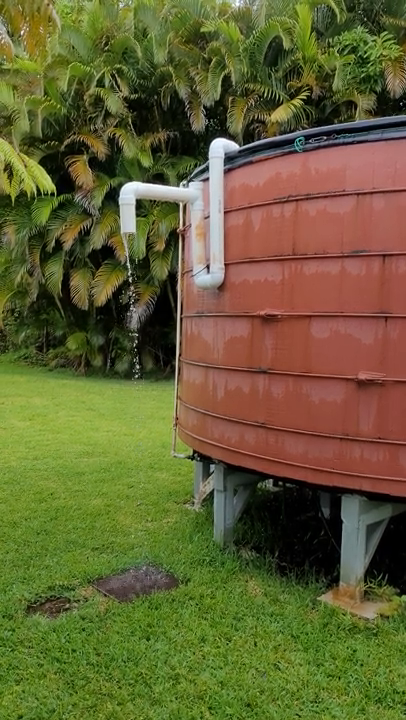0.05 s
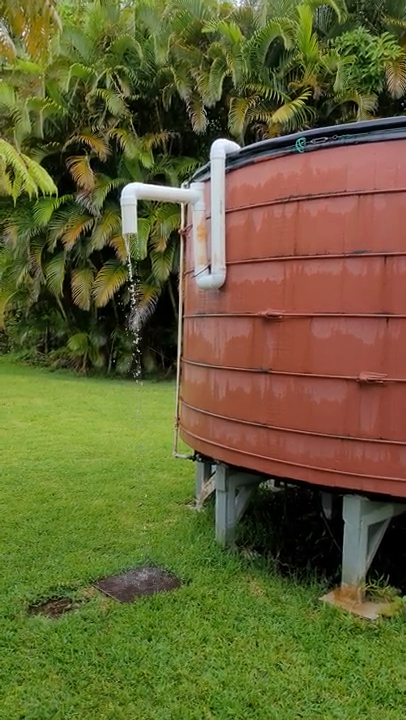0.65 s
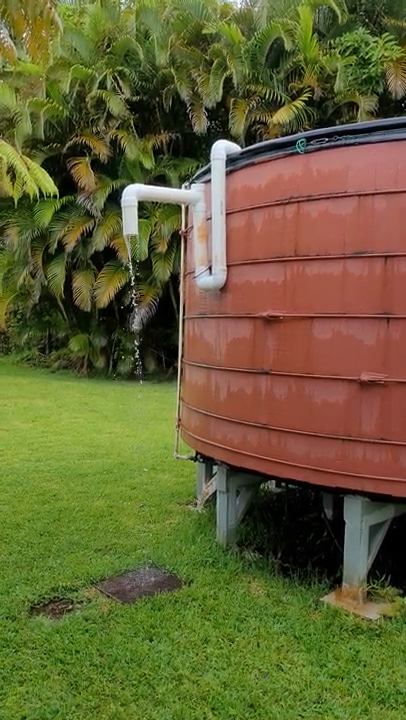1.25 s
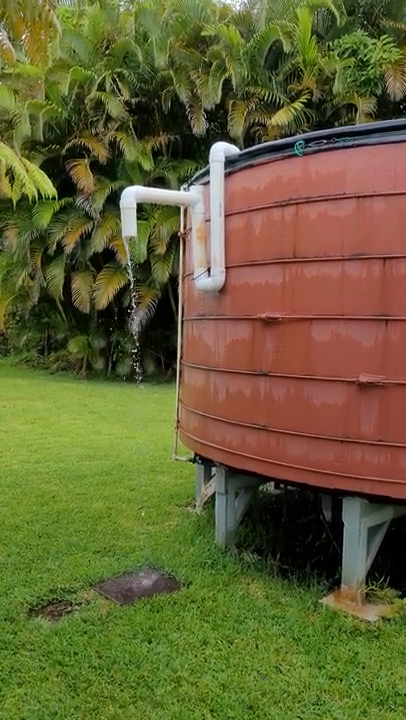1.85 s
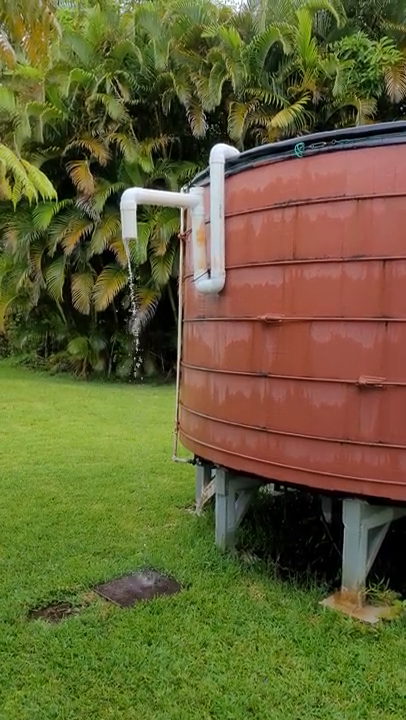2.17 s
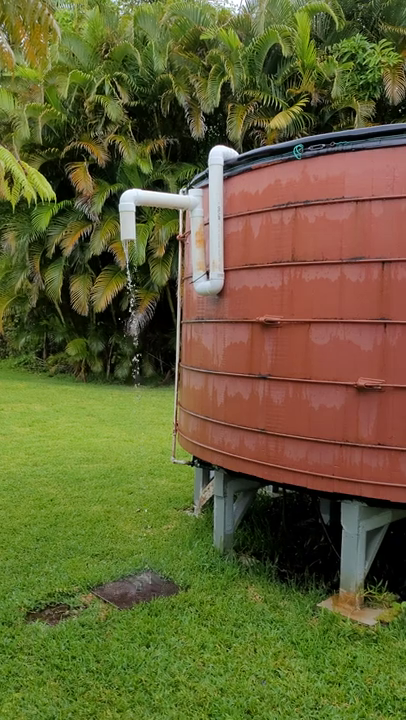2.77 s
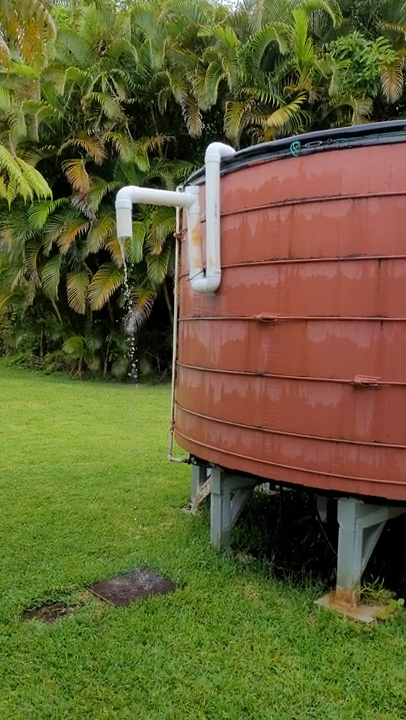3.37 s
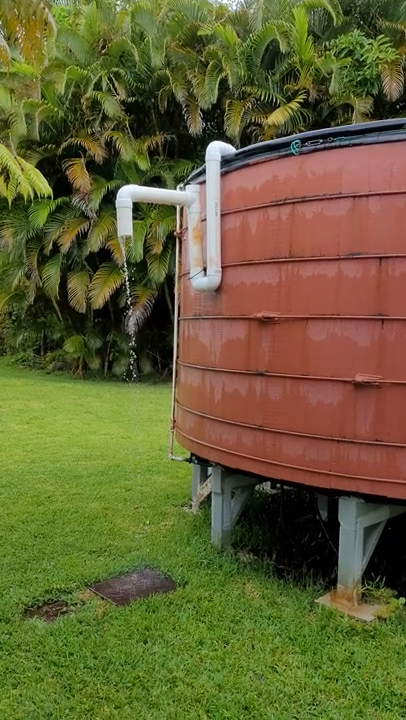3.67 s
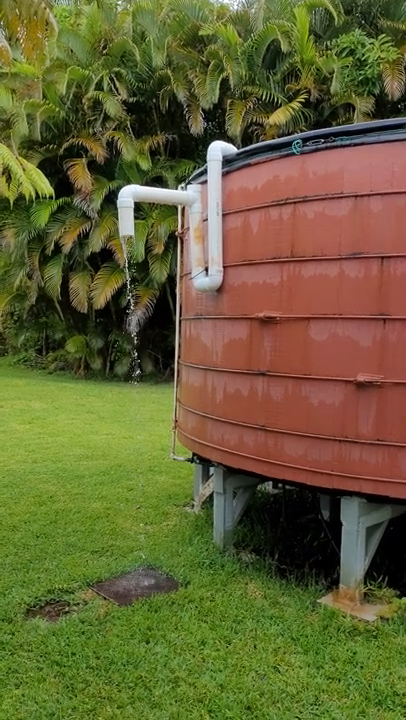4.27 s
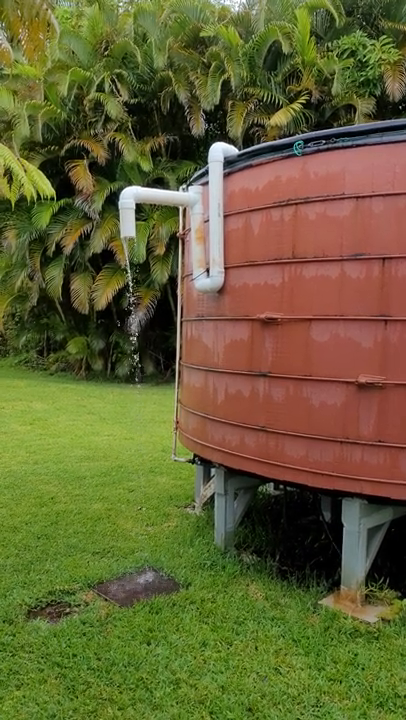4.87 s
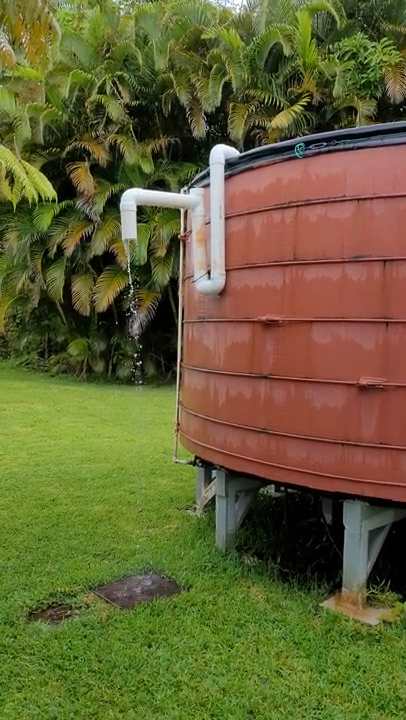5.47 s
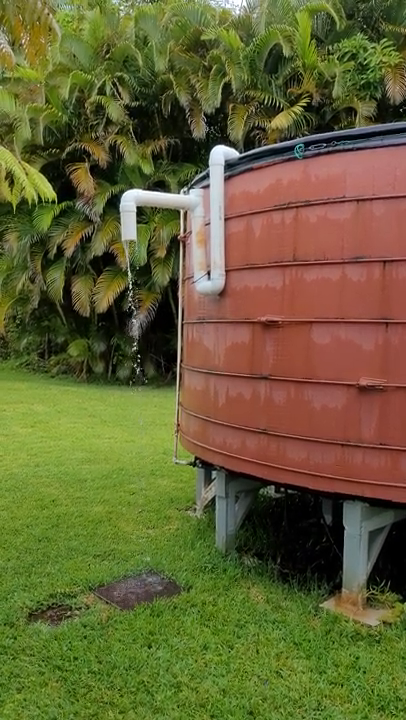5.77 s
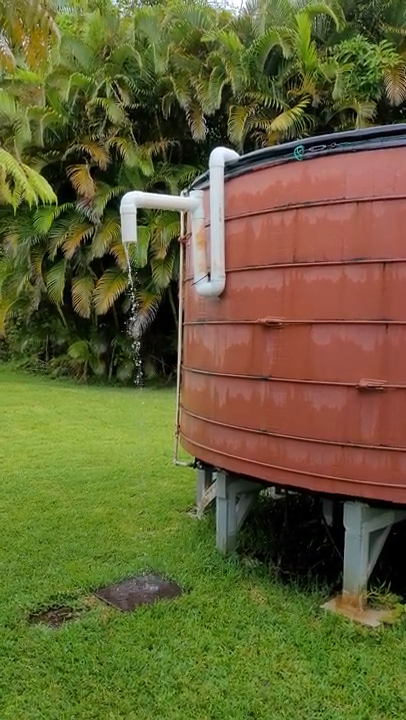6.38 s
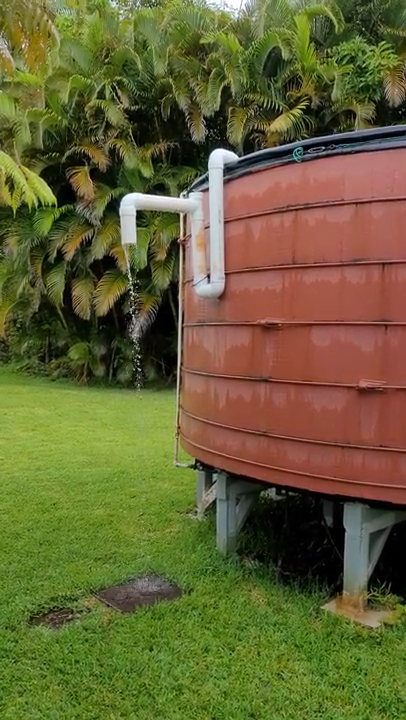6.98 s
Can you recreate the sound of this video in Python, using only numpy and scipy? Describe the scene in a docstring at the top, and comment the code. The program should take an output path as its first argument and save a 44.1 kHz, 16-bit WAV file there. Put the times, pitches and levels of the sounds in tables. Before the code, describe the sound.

From the start, a thin stream of water from a tank's overflow pipe splatters onto a wet slab, close and crisp, and continues for about seven seconds. Drops land quickly and unevenly, each a sharp, bright slap with a short splash, while fine spray patters and fizzes around them. Stronger slaps stand out near 1.3, 1.6, 2.0, 2.8, 4.9 and 5.9 seconds. Small bubbly plops are scattered through, clearest around 3.4 and 5.2 seconds. The heaviest drops add short dull thuds near 1.3, 4.6, 4.9 and 5.9 seconds. The splatter thins briefly around 5.6 seconds. The space is outdoors, with only a very short tail on the splashes. Far beneath the water lie a soft, steady hush of leaves and the faint low drone of a distant engine. At about 3.5 seconds a far bird gives one very faint, short rising whistle.

```python
"""A thin stream from a water tank's overflow pipe breaks into drops that splatter on a wet slab in a lawn.
Each drop slaps the water film and throws a short splash while fine spray patters around it. Some drops
trap bubbles and plop; the heaviest thud. A quick echo comes off a nearby hard surface, the ground or tank;
tank, legs and hedge add a short tail. Behind it: a soft hush of leaves, a distant engine, one faint bird."""
import sys
import numpy as np
from scipy import signal
from scipy.fft import rfft, irfft, next_fast_len
from scipy.io import wavfile
from scipy.ndimage import map_coordinates

SR = 44100
rng = np.random.default_rng(int(sys.argv[2]) if len(sys.argv) > 2 else 0)


def transcribe(signal):
    """Save signal, clipped to [-1, 1], as a 16-bit WAV file at the path in sys.argv[1]."""
    frames = np.atleast_2d(signal).T
    limited = np.clip(frames, -1, 1)
    pcm = np.round(limited * 32767).astype(np.int16)
    wavfile.write(sys.argv[1], SR, pcm)


N = 318843
TIME = np.arange(N) / SR
TOP_HZ = 16000

# The spray's swells and dips. Each row: time in seconds, relative level in dB.
SPRAY_LEVEL = [(0.0, -42), (2.86, -42), (3.34, -44), (3.89, -41.5), (4.15, -43.5), (5.05, -41.5),
               (5.34, -41.5), (6.12, -41.5), (6.3, -42.5), (6.42, -48.5), (6.67, -40.5), (6.97, -42.5),
               (7.09, -44), (7.23, -40)]
# The engine's drone. Each row: pitch of a partial in Hz, relative level in dB.
ENGINE_PARTIALS = [(42, -64), (63.5, -66.5), (78, -66.5), (102, -73.5)]
# Large drops on the slab. Each row: start in seconds, relative slap and splash levels in dB,
# nominal pitch in Hz.
LARGE_DROPS = [(0.0192, -31.5, -29.5, 6700), (0.0577, -31.5, -51, 6850), (0.1208, -29, -47, 7200),
               (0.2025, -28.5, -39, 4760), (0.3035, -29, -38, 7300), (0.3514, -28, -44, 7800),
               (0.4134, -22, -32, 7740), (0.4502, -24, -38, 7200), (0.4688, -26.5, -35.5, 5100),
               (0.5701, -32.5, -46, 4000), (0.6007, -31, -56, 8400), (0.6474, -33.5, -44, 7440),
               (0.6899, -27.5, -31, 7400), (0.745, -30, -40, 6300), (0.7635, -26, -30.5, 5000),
               (0.7891, -30.5, -35.5, 4700), (0.893, -30.5, -44, 6600), (0.9917, -34, -44, 4400),
               (1.0832, -30.5, -43, 6600), (1.1392, -29.0, -50, 6300), (1.1772, -27, -42, 6300),
               (1.2718, -28, -53, 9100), (1.3115, -19, -32.5, 4800), (1.4338, -21, -31, 6950),
               (1.5105, -29.0, -43, 5000), (1.5711, -25, -31, 6750), (1.645, -16.5, -29, 5000),
               (1.6984, -33, -34, 4000), (1.7196, -28.5, -41, 4570), (1.7921, -23, -35, 6750),
               (1.8062, -26, -33, 5300), (1.8463, -26, -40, 5800), (1.9849, -27, -37, 3800),
               (2.0149, -19.5, -33, 3800), (2.1694, -29.5, -42.0, 8640), (2.2033, -36, -35, 4900),
               (2.2219, -33.5, -45, 6100), (2.2629, -27.5, -35.5, 4200), (2.3457, -28, -35.5, 6600),
               (2.42, -28.5, -35, 4900), (2.4359, -24, -41, 7760), (2.5638, -30, -32.0, 5000),
               (2.5882, -23, -40, 6200), (2.6665, -32.5, -40, 5600), (2.8024, -17, -30.5, 4700),
               (2.8363, -27.5, -39, 6500), (2.8649, -29, -38, 7200), (2.9037, -25.5, -46.0, 7200),
               (2.9598, -29.5, -34.5, 7700), (2.9941, -32, -52, 7100), (3.0879, -32, -38.0, 5800),
               (3.1298, -29.5, -42.5, 5300), (3.2384, -23.5, -35.5, 6600), (3.3768, -25.5, -37, 5400),
               (3.4137, -29.0, -40, 4400), (3.43, -26.5, -45, 3080), (3.5422, -28.5, -39, 4770),
               (3.6888, -25, -33.5, 6600), (3.8266, -27, -41, 5500), (3.8442, -29.5, -40, 6230),
               (3.9166, -32, -51, 4200), (3.9348, -22.5, -36, 6500), (3.9558, -25.5, -36.5, 5300),
               (3.999, -26.5, -35, 6600), (4.0207, -27, -35, 5000), (4.0675, -22.0, -40.5, 4300),
               (4.12, -28.0, -45, 4360), (4.1638, -31.5, -50, 6000), (4.3034, -29.5, -34.5, 5170),
               (4.3492, -32, -49, 5400), (4.4072, -26.5, -32, 4400), (4.4236, -31, -40, 4700),
               (4.4424, -28.5, -49, 5630), (4.4653, -29, -30, 6330), (4.4936, -24.5, -39, 5060),
               (4.6093, -29.5, -41.5, 5360), (4.6908, -28, -58, 8600), (4.7415, -32.0, -34.5, 7600),
               (4.8601, -17, -29, 4960), (4.898, -27.5, -36, 5470), (4.922, -31, -53, 6040),
               (4.9729, -28.5, -52, 5300), (5.0244, -24.5, -35, 6700), (5.1628, -28.5, -36, 3680),
               (5.1753, -27, -45, 3640), (5.1978, -25.5, -51, 6000), (5.2538, -29.5, -45, 7240),
               (5.3118, -27, -43.5, 3960), (5.4333, -29.5, -42, 6300), (5.7943, -30, -52, 7500),
               (5.8132, -29, -44, 4160), (5.8455, -23.5, -35, 7800), (5.8544, -16.5, -32.5, 5660),
               (5.9065, -26.5, -39.0, 4900), (5.9249, -29, -46, 6160), (5.9867, -21.5, -31.5, 4630),
               (6.0494, -25.5, -32, 5600), (6.0936, -29.0, -40, 5900), (6.1159, -28, -30.5, 4350),
               (6.1317, -22.5, -35.0, 4400), (6.1645, -26.5, -34, 5470), (6.2073, -28, -32, 5760),
               (6.284, -28.5, -38, 4250), (6.3124, -29, -40, 4460), (6.4446, -20.5, -29.5, 4900),
               (6.468, -24, -41, 4350), (6.4929, -26.5, -36, 6840), (6.5348, -32, -35, 5100),
               (6.5722, -30, -37, 6800), (6.6373, -27.5, -43, 6160), (6.6816, -24, -34.5, 3580),
               (6.7074, -26.5, -41, 4080), (6.9242, -26.5, -40, 4830), (6.9846, -31, -38.5, 5170),
               (7.0299, -27, -53, 5270), (7.0807, -29, -38, 8200), (7.1243, -28, -35, 6600),
               (7.1897, -28.5, -39, 6270), (7.2135, -27, -48, 5200)]
# Drops plunging into standing water. Each row: start in seconds, relative level in dB, bubble pitch in Hz.
BUBBLE_PLOPS = [(0.7896, -24.5, 3330), (1.3109, -30, 2960), (1.6467, -25, 2700), (1.846, -25.5, 2130),
                (2.0147, -32, 2450), (2.2638, -33, 2600), (2.801, -27, 3260), (3.3767, -22.5, 2630),
                (3.4291, -25, 2160), (4.066, -23, 3000), (4.1195, -27, 1900), (4.8594, -23, 1670),
                (5.1749, -19, 2980), (5.3127, -36, 2860), (6.131, -27, 2970), (6.2867, -26, 2700),
                (6.68, -26, 1890), (6.7067, -24, 2960)]
# The heaviest drops. Each row: start in seconds, relative peak level in dB.
HEAVY_DROPS = [(1.2712, -42), (4.608, -44), (4.859, -36), (5.8535, -38)]
# The bird's glide. Each row: time in seconds, pitch in Hz, level in dB.
BIRD_GLIDE = [(3.48, 1620, -75), (3.51, 1680, -53), (3.55, 1810, -55), (3.59, 1870, -59), (3.64, 1850, -74)]
# The tone colour of each layer. Each row: frequency in Hz, relative gain in dB.
PATTER_EQ = [(300, -22), (1200, 5.5), (2200, -5.5), (3200, 3.5), (4700, -2.5), (6200, -0.5), (7500, 2),
             (9000, -3), (11500, -16), (15000, -2)]
MIST_EQ = [(2000, -28), (6000, 1), (8800, -3.5), (11500, 2), (14000, 4), (16000, -4)]
LEAVES_EQ = [(20, -10), (150, -10), (220, -2), (400, 1.5), (700, 5), (1100, 4), (1600, 1.5), (2500, -2),
             (6000, -11.5), (16000, -38)]
RUMBLE_EQ = [(15, -32), (30, -11), (50, -1.5), (66, -1), (85, -2.5), (120, -10), (160, -17), (400, -59)]
SPLAT_EQ = [(150, -22), (600, -0.5), (1500, 3.5), (3000, 5.5), (4700, -2.5), (6300, 3.5), (7500, 0.5),
            (8800, -6.5), (11500, 3.5), (15500, 3.5)]
# The colour of the phone's two microphone ports. Each row: frequency in Hz, left over right in dB.
PORT_BALANCE = [(300, 1.5), (1200, -2.5), (2000, 1), (3200, -1), (5000, 2), (6500, 3), (8200, -7),
                (9800, 3.5), (11200, -3.5), (14000, 2)]


def amp(db):
    return 10 ** (np.asarray(db) / 20)


def unit_rms(x):
    return x / np.sqrt(np.mean(x ** 2) + 1e-20)


def eq_db(points, hz):
    """An EQ curve read on a log frequency axis."""
    knots_hz, db = np.transpose(points)
    return np.interp(np.log(hz + 1), np.log(knots_hz + 1), db)


def curves(rows):
    """One value per sample for each column after the time."""
    times, *columns = np.transpose(rows)
    return [np.interp(TIME, times, column) for column in columns]


def wobble(rate):
    """A smooth random curve, rate knots a second."""
    return map_coordinates(rng.standard_normal(int(N * rate / SR) + 4), [TIME * rate])


def filtered(x, response):
    """x through a frequency response."""
    size = next_fast_len(N + SR // 2)
    return irfft(rfft(x, size) * response(np.fft.rfftfreq(size, 1 / SR)), size)[..., :N]


def coloured(x, eq):
    """x through an EQ curve, at rms 1."""
    return unit_rms(filtered(x, lambda hz: amp(eq_db(eq, hz))))


def delayed(x, seconds):
    return map_coordinates(x, [np.arange(N) - seconds * SR])


def placed(times, sounds):
    """Each row of sounds mixed in at its start time."""
    index = np.maximum(np.round(times * SR).astype(int), 0)[:, None] + np.arange(sounds.shape[1])
    return np.bincount(index.ravel(), sounds.ravel(), N)[:N]


def bell(hz, centre_hz, octaves):
    return np.exp(-.5 * (np.log2((hz + 1) / centre_hz) / octaves) ** 2)


def tight_pulses(spectra):
    """The snappiest (minimum-phase) pulse for each row of gains."""
    cepstrum = irfft(np.log(spectra + 1e-6))
    half = cepstrum.shape[-1] // 2
    cepstrum[:, 1:half] *= 2
    cepstrum[:, half + 1:] = 0
    return irfft(np.exp(rfft(cepstrum)))


def grains(times, hz, strength, cycles, glide, samples):
    """Tiny bubbles and droplet impacts: each swells, rings for a few cycles and rises in pitch."""
    turns = hz.reshape(-1, 1) * np.arange(samples) / SR
    age = turns / cycles
    phase = turns * (1 + glide * np.minimum(age, 10)) + rng.random((hz.size, 1))
    ring = age * np.exp(-age) * np.sin(2 * np.pi * phase)
    ring /= np.linalg.norm(ring, axis=1, keepdims=True) + 1e-12
    return placed(times.ravel(), ring * strength.reshape(-1, 1))


def bursts(starts, db, hz, life_s, octaves, cycles, spread_db, count, samples):
    """A cluster of grains after each start, thinning out and scattered in pitch around hz."""
    shape = (len(starts), count)
    wait = -life_s * np.log(1 - (np.arange(count) + rng.random(shape)) / count)
    pitch = np.minimum(hz[:, None] * 2 ** (octaves * rng.standard_normal(shape)), TOP_HZ)
    strength = amp(spread_db * rng.standard_normal(shape)) * np.exp(-.5 * wait / life_s)
    strength *= (amp(db) * np.sqrt(life_s * SR / 2) / np.linalg.norm(strength, axis=1))[:, None]
    return grains(starts[:, None] + wait, pitch, strength, cycles, glide=0.0057, samples=samples)


def patter(centre_hz, octaves, spread_db, count):
    """Thrown droplets land again at random, each with its own pitch."""
    pitch = np.minimum(centre_hz * 2 ** (octaves * rng.standard_normal(count)), TOP_HZ)
    strength = amp(spread_db * np.clip(rng.standard_normal(count), -2, 1.7))
    starts = rng.random(count) * N / SR
    return coloured(grains(starts, pitch, strength, cycles=0.77, glide=0.0058, samples=128), PATTER_EQ)


def mist(per_second, spread_db):
    """The finest droplets land as a bright fizz of uneven ticks."""
    hit = rng.random(N) < per_second / SR
    strength = amp(spread_db * np.clip(rng.standard_normal(N), -2, 2))
    return coloured(hit * strength * rng.choice([-1, 1], N), MIST_EQ)


def spray(patter_db, mist_db, clump_db):
    """The spray comes in clumps: its larger droplets patter, the finest fizz."""
    level = curves(SPRAY_LEVEL)[0] + clump_db * wobble(70)
    coarse = patter(centre_hz=5570, octaves=0.47, spread_db=9.0, count=4500) * amp(level + patter_db)
    fine = mist(per_second=1800, spread_db=9.0) * amp(level + mist_db + 2.65 * wobble(110))
    return coarse + fine


def leaves(level_db):
    """Leaves hush all around: a wide, gently wavering bed."""
    noise = rng.standard_normal((2, N)) + 0.48 * rng.standard_normal(N)
    return coloured(noise, LEAVES_EQ) * amp(level_db + 0.74 * wobble(2.94))


def distant_engine(rumble_db, drone_gain_db):
    """Far away an engine drones unsteadily over a low, nearly mono rumble."""
    noise = rng.standard_normal(N) + 0.18 * rng.standard_normal((2, N))
    sound = coloured(noise, RUMBLE_EQ) * amp(rumble_db)
    for hz, db in ENGINE_PARTIALS:
        swell = amp(db + drone_gain_db + 3.8 * wobble(3.92))
        sound += swell * np.sin(2 * np.pi * hz * TIME + 1.36 * wobble(4))
    return sound


def small_drops(per_second, mean_db, spread_db, centre_hz, octaves):
    """Rows like LARGE_DROPS for small bright drops: unevenly timed, weaker when the spray thins."""
    count = int(per_second * N / SR)
    chance = rng.random((count, 3))
    starts = (np.arange(count) + chance[:, 0]) / per_second
    weight, detune = np.sqrt(12) * (chance[:, 1:].T - .5)  # unit variance
    spray_times, spray_db = np.transpose(SPRAY_LEVEL)
    swell_db = np.interp(starts, spray_times, spray_db - spray_db.mean())
    slap_db = mean_db + spread_db * weight + 1.8 * swell_db
    splash_db = slap_db - 14
    return np.column_stack([starts, slap_db, splash_db, centre_hz * 2 ** (octaves * detune)])


def slaps(drops, octaves, skirt_db, energy_s, gain_db):
    """A drop hitting the water film is one sharp pulse: a broad hump of tone on a weak skirt."""
    starts, db, _, pitch = drops.T
    hz = np.fft.rfftfreq(512, 1 / SR)
    spectra = (bell(hz, 0.89 * pitch[:, None], octaves) + amp(skirt_db)) * amp(eq_db(SPLAT_EQ, hz))
    spectra /= np.sqrt(np.mean(spectra ** 2 * (hz < TOP_HZ), axis=1, keepdims=True))
    strength = amp(db + gain_db) * np.sqrt(energy_s * SR)  # as much energy as that level held for energy_s
    return placed(starts, tight_pulses(spectra) * strength[:, None])


def splashes(drops, after_s, gain_db):
    """After each slap the film tears into a dying shower of droplets and tiny bursting bubbles."""
    starts, _, db, pitch = drops.T
    shower = bursts(starts + after_s, db + gain_db, 0.88 * pitch,
                    life_s=.021, octaves=0.53, cycles=0.75, spread_db=3, count=50, samples=128)
    return filtered(shower, lambda hz: amp(eq_db(SPLAT_EQ, hz)))


def direct_and_near_echo(x, lag_s, echo_s, wander_s, echo_left, echo_right):
    """Splatter reaches the right port first, then echoes off ground or tank; the landing spot wanders."""
    echo = delayed(x, echo_s + wander_s * wobble(25))
    echo = filtered(echo, lambda hz: 1 / (1 + (hz / 11000) ** 2))
    left = delayed(0.55 * x + echo_left * echo, lag_s + .000012 * wobble(30))
    right = 0.89 * x + echo_right * echo
    return np.array([left, right])


def diffuse_tail(x, t60_s, wet_db, block=1024, samples=6144):
    """Tank wall, legs and hedge scatter a short tail, new for each port and block as the drops move."""
    blocks = np.pad(x, (0, -N % block)).reshape(-1, block)
    t = np.arange(samples) / SR
    envelope = amp(-60 * t / t60_s) * (1 - np.exp(-t / 0.0002))
    tails = rng.standard_normal((2, len(blocks), samples)) * envelope
    tails /= np.linalg.norm(tails, axis=2, keepdims=True)
    wet = signal.fftconvolve(blocks[None], tails, axes=2)
    starts = np.arange(len(blocks)) * block / SR
    return amp(wet_db) * np.array([placed(starts, port) for port in wet])


def plops(gain_db):
    """Drops plunging into standing water trap larger bubbles, which ring lower and longer."""
    starts, db, pitch = np.transpose(BUBBLE_PLOPS)
    return bursts(starts + 0.000986, db + gain_db, pitch,
                  life_s=.014, octaves=0.16, cycles=1.5, spread_db=1, count=30, samples=768)


def thuds(centre_hz, octaves, gain_db):
    """The heaviest drops push on the ground with a short dull pulse."""
    starts, db = np.transpose(HEAVY_DROPS)
    hz = np.fft.rfftfreq(2048, 1 / SR)
    pulse = tight_pulses(bell(hz[None], centre_hz, octaves))
    return placed(starts, pulse / np.abs(pulse).max() * amp(db + gain_db)[:, None])


def bird():
    """One far, rising whistle on a pure tone."""
    hz, db = curves(BIRD_GLIDE)
    sounding = (TIME > BIRD_GLIDE[0][0]) & (TIME < BIRD_GLIDE[-1][0])
    return sounding * amp(db) * np.sin(2 * np.pi * np.cumsum(hz) / SR)


def scene():
    """Crisp splatter up close, the quiet garden behind it."""
    small = small_drops(per_second=17, mean_db=-34, spread_db=2.5, centre_hz=6980, octaves=0.19)
    drops = np.vstack([LARGE_DROPS, small])
    hits = slaps(drops, octaves=0.61, skirt_db=-16.5, energy_s=0.0014, gain_db=2.5)
    wash = splashes(drops, after_s=.002, gain_db=-2.5) + plops(gain_db=-8.5)
    wash += spray(patter_db=-4.0, mist_db=-4.0, clump_db=3.0)
    water = direct_and_near_echo(hits + wash, lag_s=.00018, echo_s=.00282, wander_s=.00008,
                                 echo_left=0.87, echo_right=0.21)
    water += diffuse_tail(hits, t60_s=0.03, wet_db=-5.5) + diffuse_tail(wash, t60_s=0.087, wet_db=-3.5)
    water += thuds(centre_hz=453, octaves=2.04, gain_db=14.5)
    garden = leaves(level_db=-54.5) + distant_engine(rumble_db=-63.5, drone_gain_db=-2.0) + bird()
    return water + garden


def record(dry):
    """The two ports colour the sound differently; the phone keeps nothing above its band limit."""
    return filtered(dry, lambda hz: amp(np.outer([.5, -.5], eq_db(PORT_BALANCE, hz))) * (hz < TOP_HZ))


dry = scene()
out = record(dry)
transcribe(out)
```